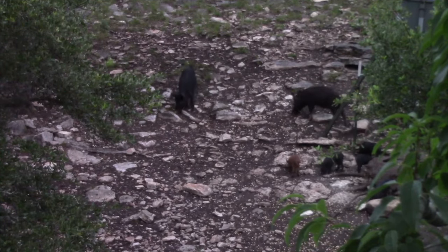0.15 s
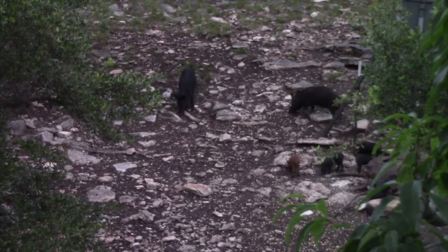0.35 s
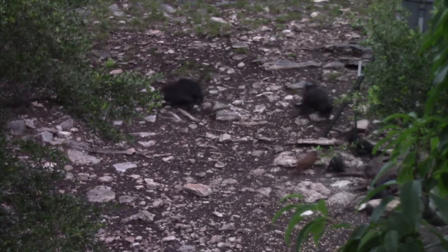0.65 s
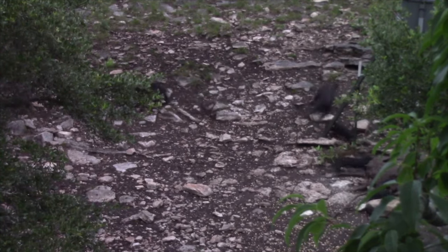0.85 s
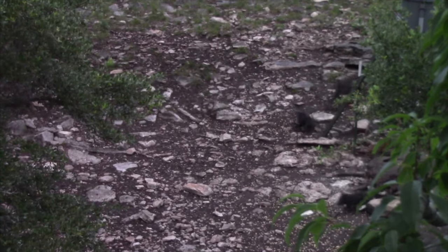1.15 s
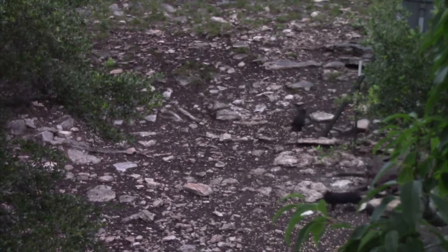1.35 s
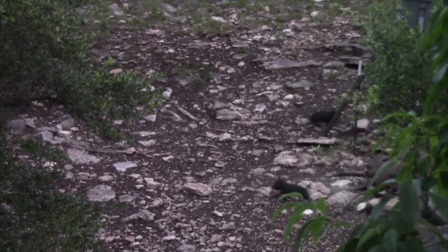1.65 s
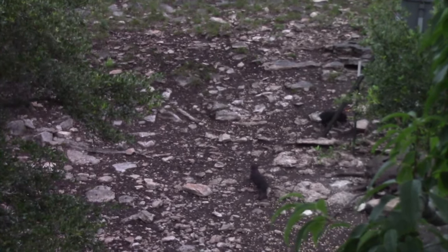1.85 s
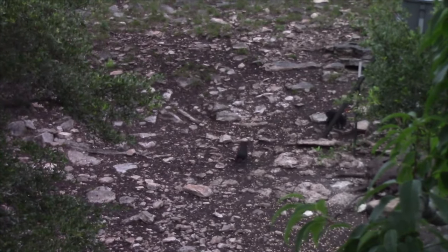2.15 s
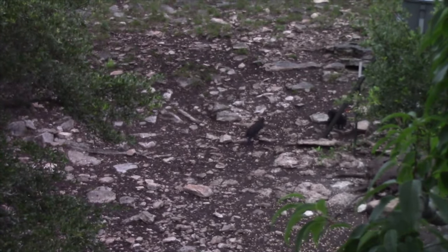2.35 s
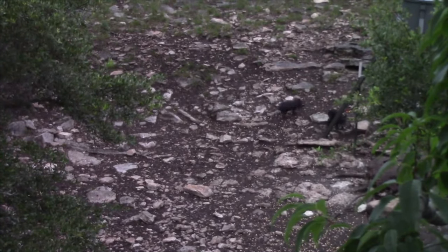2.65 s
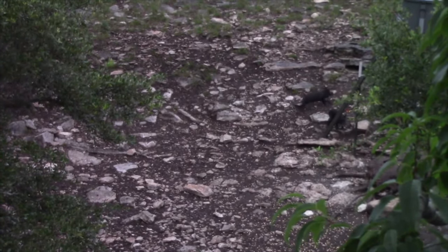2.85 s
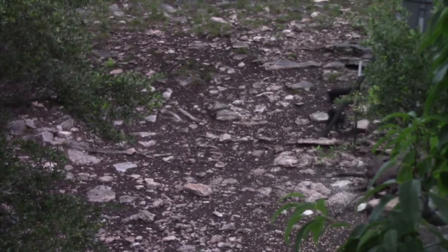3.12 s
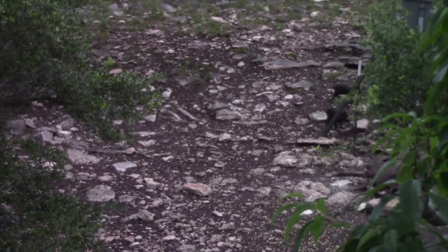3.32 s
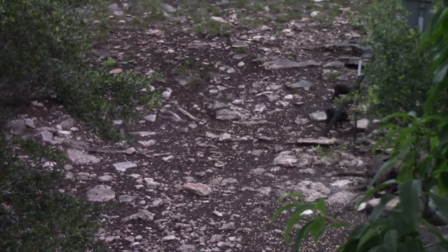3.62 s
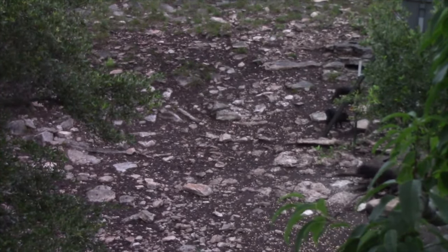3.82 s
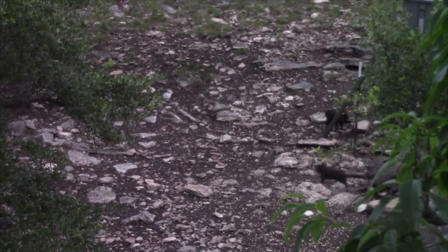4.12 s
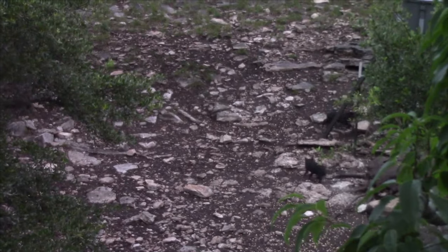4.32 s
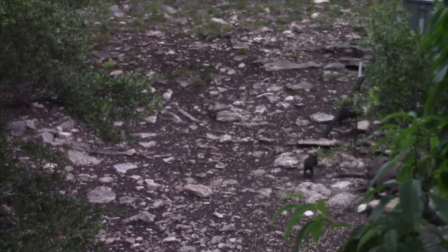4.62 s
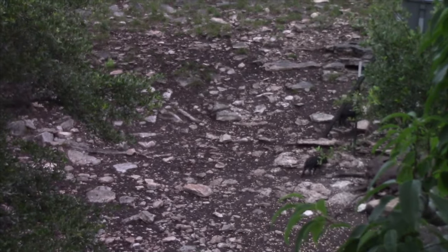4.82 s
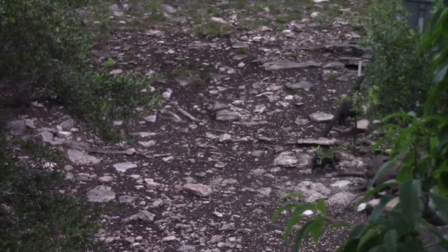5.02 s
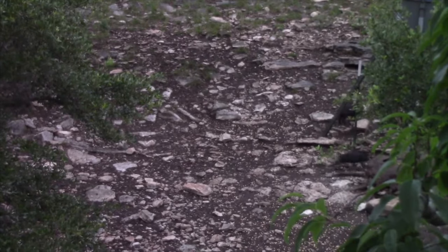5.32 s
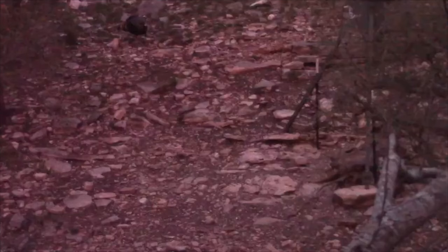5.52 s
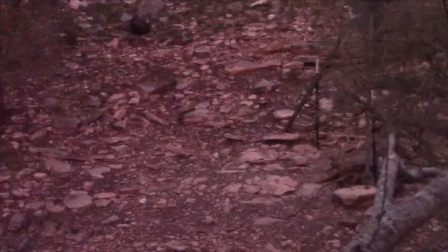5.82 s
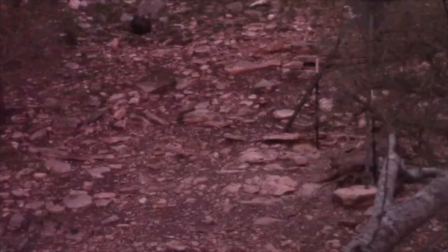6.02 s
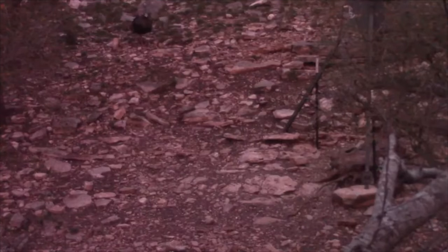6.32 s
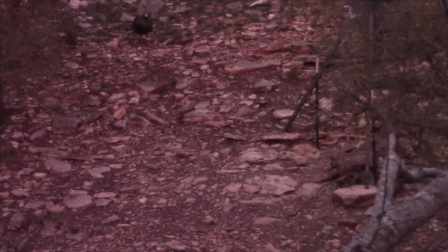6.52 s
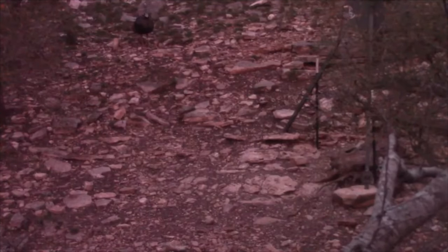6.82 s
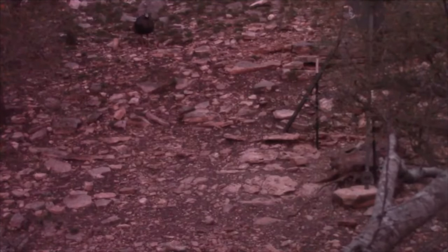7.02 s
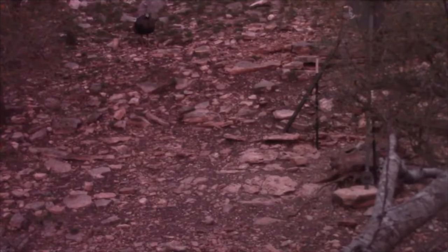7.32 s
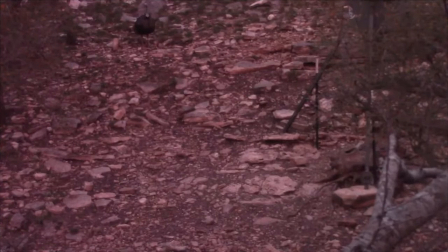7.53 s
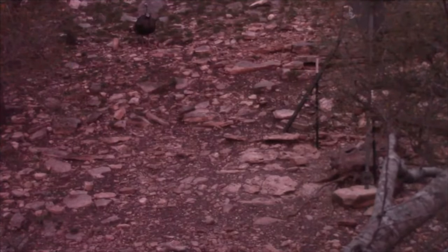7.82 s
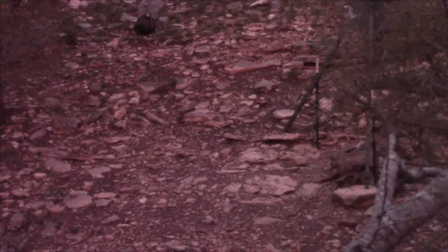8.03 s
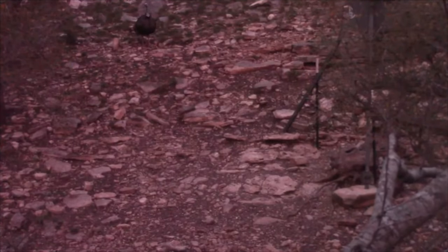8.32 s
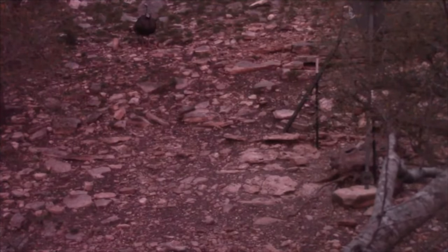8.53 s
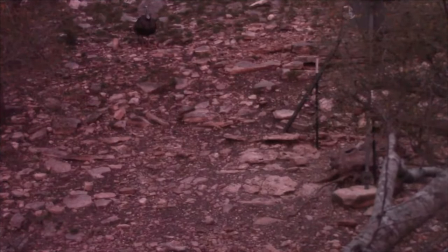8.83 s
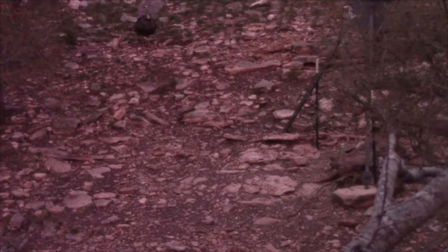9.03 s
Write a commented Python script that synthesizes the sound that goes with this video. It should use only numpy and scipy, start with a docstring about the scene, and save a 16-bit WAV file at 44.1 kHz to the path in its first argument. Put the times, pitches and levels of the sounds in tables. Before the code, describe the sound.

Bow twang and arrow thud startle animals into a clattering run across stones and leaf litter, frogs calling, before a cut to faint insects and wind buffets.

```python
"""Bow shot and bolting pigs in a stony clearing.

A trigger click, a bow (decaying modes, noise slaps) and an arrow strike; wild pigs bolt: grain noise for gravel
and leaves, resonant bursts for hooves, stones and twigs. Near frogs call in pulse runs over a noise-band chorus.
After a gap of 30 ms the place is quieter: distant frogs, two faint insect trills (gliding tones) and gusts
of low noise buffeting the microphone.
"""
import sys
import numpy as np
from scipy import signal
from scipy.fft import rfft, irfft, next_fast_len
from scipy.io import wavfile

SR = 44100
rng = np.random.default_rng(int(sys.argv[2]) if len(sys.argv) > 2 else 0)


def waveform_to_disk(signal):
    """Save audio, clipped to [-1, 1], as 16-bit WAV at the path in sys.argv[1]."""
    frames = np.transpose(np.atleast_2d(signal))
    scaled = np.clip(frames, -1, 1) * 32767
    samples = np.round(scaled).astype(np.int16)
    wavfile.write(sys.argv[1], SR, samples)


N = 403938
TIME = np.arange(N) / SR

RELEASE_S = 0.2522
GAP_START_S, GAP_END_S = 5.548, 5.578

# arrow punches through and meets the ground: (time [s], onset rms level [dB])
ARROW_BLOWS = [(.5164, -12), (.521, -15.5), (.527, -13.5), (.5335, -16)]


def amp(db):
    """Decibels to gain."""
    return 10 ** (np.asarray(db) / 20)


def unit(x):
    """Scale to rms 1."""
    return x / np.sqrt(np.mean(x ** 2) + 1e-20)


def in_time(rows):
    """Each column of a curve at every sample."""
    s, *columns = np.transpose(rows)
    return [np.interp(TIME, s, c) for c in columns]


def add(out, s, sound):
    """Mix a sound in at a time."""
    i = int(s * SR)
    out[i:i + len(sound)] += sound[:N - i]


def span(length_s):
    """Time axis of a short sound."""
    return np.arange(int(length_s * SR)) / SR


def fade(t, t60):
    """Silent before zero, then falling 60 dB in t60 seconds."""
    return (t >= 0) * amp(-60 * np.clip(t / t60, 0, 4))


def swell(s, rise_s, hold_s, fall_db_per_s):
    """Gain that rises from s, holds, then dies away."""
    t = TIME - s
    return np.clip(t / rise_s, 0, 1) * amp(-fall_db_per_s * np.clip(t - rise_s - hold_s, 0, 10))


def summed_db(gains):
    """Level of unrelated sounds heard together."""
    return 10 * np.log10(sum(g ** 2 for g in gains))


def band(x, low_hz, high_hz, order=2):
    """Causal band-pass."""
    edges_hz = [low_hz, min(high_hz, SR / 2 - 2000)]
    return signal.sosfilt(signal.butter(order, edges_hz, "band", fs=SR, output="sos"), x)


def coloured(x, spectrum):
    """Weight a signal by a (frequency [Hz], level [dB]) curve; rms 1."""
    hz, db = np.transpose(spectrum)
    size = next_fast_len(len(x))
    f = np.maximum(np.arange(size // 2 + 1) * SR / size, 1)
    gain = amp(np.interp(np.log(f), np.log(hz), db, left=-90, right=-90))
    return unit(irfft(rfft(x, size) * gain, size)[:len(x)])


def hiss(spectrum, size=N):
    """Smooth noise with a spectrum."""
    return coloured(rng.standard_normal(size), spectrum)


def drift(rate):
    """Slow chance: random knots of spread 1, rate per second, joined by lines."""
    knots = rng.standard_normal(4000)
    return np.interp(TIME * rate, np.arange(len(knots)), knots)


def grains(per_s, spread_db, size=N):
    """Random tiny clicks of uneven size; rms 1."""
    sizes = amp(spread_db * np.minimum(rng.exponential(1, size), 4))
    hits = rng.random(size) < per_s / SR
    return unit(rng.standard_normal(size) * sizes * hits)


def crackle(per_s, spread_db, size=N, count=16):
    """Tiny fractures, each ringing briefly in one of several bands."""
    edges_hz = np.geomspace(400, 16000, count + 1)
    bands = zip(edges_hz, edges_hz[1:])
    return unit(sum(band(grains(per_s / count, spread_db, size), low, high) for low, high in bands))


def snap(hz, t60, width, click=1.0):
    """A hard contact: a click and a dying burst in one broad resonance; peak 1."""
    t = span(.08)
    edge = 1 + abs(width)
    force = rng.standard_normal(len(t)) * fade(t, t60)
    force[0] = click * np.sqrt(np.sum(force ** 2))
    burst = band(force, hz / edge, hz * edge)
    return burst / np.abs(burst).max()


def blows(rows, colour, t60):
    """A quick series of cracks on one body."""
    power = sum((amp(db) * fade(TIME - s, t60)) ** 2 for s, db in rows)
    return hiss(colour) * np.sqrt(power)


def placed(x, pan_db):
    """Lean a sound to the left by pan_db."""
    return x * amp(np.array([[pan_db], [-pan_db]]) / 2)


def release():
    """The trigger clicks just left of the microphone: one very short snap."""
    out = np.zeros(N)
    add(out, RELEASE_S, amp(-0.5) * snap(hz=7500, t60=0.0017, width=0.66))
    return placed(out, pan_db=5.5)


def bow():
    """The arrow hisses and rasps over its rest ever faster, the string slams home and buzzes."""
    # limbs and string: (frequency [Hz], level [dB], t60 [s])
    modes = [(145, -30, .46), (236, -22, .24), (292, -24, .16), (387, -8.5, .5), (415, -15, .22),
             (470, -24, .14), (778, -20, .15), (1048, -21, .4), (1104, -26, .2)]
    # string slaps and fittings rattle: (time [s], onset rms level [dB])
    slaps = [(.2738, -4.5), (.2802, -15), (.2853, -11.5), (.2888, -20), (.319, -25)]
    # rattle spectrum: (frequency [Hz], level [dB])
    rattle_colour = [(100, -26.5), (200, -3), (400, 4), (600, -9.5), (1050, 1), (1400, -8.5), (3000, -9),
                     (5000, -14), (7000, -11), (16000, -30.5)]
    rasp_s, slam_s, string_stop_s = 0.2672, 0.2735, 0.321

    out, t = np.zeros(N), TIME - slam_s
    out += amp(-22.5) * unit(band(rng.standard_normal(N), 1900, 11000)) * fade(TIME - RELEASE_S, t60=0.2)

    u = span(0.0071)
    slide = np.sin(2 * np.pi * np.cumsum(np.geomspace(3000, 6800, len(u))) / SR)
    shaft = np.sin(2 * np.pi * 2900 * u)
    rasp = amp(-15.5) * slide + amp(-3) * shaft * fade(u, t60=0.028)
    add(out, rasp_s, rasp * signal.windows.tukey(len(u), .4))

    # the string comes to rest against its damper; the heavy limbs (below 330 Hz) ring on
    damper_db = np.interp(TIME, [string_stop_s, string_stop_s + .01, string_stop_s + .12], [0, -15, -30])
    attack = np.clip(t / 0.0016, 0, 1)
    for hz, db, t60 in modes:
        out += amp(db + damper_db * (hz > 330)) * fade(t, t60) * attack * np.sin(2 * np.pi * hz * t)
    rattle = amp(-12.0) * hiss(rattle_colour) * fade(t, t60=0.26)
    slap_colour = [(50, -16.0), (200, 2.5), (900, -3.5), (3000, 6.0), (8000, -1.5), (16000, -22.5)]
    return out + rattle + blows(slaps, slap_colour, t60=0.015)


def arrow():
    """A tick as the point arrives, a run of hollow whacks, then grit flying."""
    # whack spectrum: (frequency [Hz], level [dB])
    whack_colour = [(41, -21), (70, -11), (307, -4.5), (620, -17), (1120, -3), (1600, -16), (2000, -7.5),
                    (5620, -22.5), (8280, -16), (16000, -33)]
    tick_s, grit_s = 0.5075, 0.533
    out = blows(ARROW_BLOWS, whack_colour, t60=0.027)
    add(out, tick_s, amp(-20.5) * snap(hz=8750, t60=0.025, width=0.06))
    add(out, tick_s, amp(-24.5) * snap(hz=2980, t60=0.008, width=0.49))
    chips = crackle(per_s=6000, spread_db=3.5)
    grit = coloured(chips, [(500, 2.0), (2000, -9), (4000, -2), (10000, -1.0), (16000, -18)])
    return out + amp(-25.5) * grit * fade(TIME - grit_s, t60=0.21)


def bustle(fall_db_per_s, axis):
    """Level [dB] of hooves on stones (axis 0) or leaves (1): grazing, stampede, stragglers, single dashes."""
    # single pigs dash across: (time [s], trampling level [dB], dry leaves level [dB])
    dash_rows = [(1.96, -51.5, -52), (2.42, -57, -56), (3.02, -64, -58.5), (3.83, -59.5, -58),
                 (4.44, -49, -54.5), (4.83, -64, -71)]
    # (trampling, dry leaves)
    stampede_db, stragglers_db, grazing_db = (-47, -45.5), (-58, -61.5), (-60, -73)
    bolt_s = 0.3
    flat_out = swell(bolt_s, rise_s=0.2, hold_s=0.32, fall_db_per_s=fall_db_per_s)
    stampede = amp(stampede_db[axis]) * flat_out
    stragglers = amp(stragglers_db[axis]) * (TIME > bolt_s)
    dashes = [amp(db[axis]) * swell(s, rise_s=0.011, hold_s=0.056, fall_db_per_s=56) for s, *db in dash_rows]
    return summed_db([amp(grazing_db[axis]), stampede, stragglers, *dashes])


def pebbles(ground_db, above_db=-3.0, count=90):
    """Small stones and twigs tick at random, louder while the herd is busy."""
    out = np.zeros(N)
    start_s = ARROW_BLOWS[0][0]
    for when, pitch, size in rng.random((count, 3)):
        s = start_s + when * (GAP_START_S - start_s)
        hz = 400 * 16 ** pitch
        level_db = ground_db[int(s * SR)] + above_db + 9 * size ** 2
        add(out, s, amp(level_db) * snap(hz, t60=.018, width=.7))
    return out


def herd():
    """Gravel and leaf litter crackle under the hooves in clumps; branches swish past."""
    # gravel and leaf spectra: (frequency [Hz], level [dB])
    gravel_colour = [(40, -33.5), (90, -3), (280, 1.5), (570, -0.5), (750, -4), (1250, -5.5), (2600, -8.5),
                     (3500, -22)]
    leaf_colour = [(1800, -22.5), (2700, 9.5), (4800, 1), (7000, -2.5), (10500, -8.5), (16000, -24)]
    # bodies brush twigs and leaves: (time [s], level [dB], length [s], centre [Hz])
    swishes = [(0.782, -32, 0.008, 3440), (0.913, -40.5, 0.025, 5500), (1.753, -46, 0.026, 7200),
               (1.891, -58, .15, 9000), (3.012, -39, 0.019, 3000), (3.019, -39, 0.012, 7300),
               (3.111, -50, 0.05, 2600), (4.433, -44, 0.055, 1900), (4.802, -45, 0.09, 3300),
               (5.021, -45.5, 0.036, 2650), (5.132, -49, 0.027, 2570)]

    ground_db = bustle(fall_db_per_s=9.5, axis=0)
    litter_db = bustle(fall_db_per_s=22, axis=1)
    steps_db = 3.7 * drift(rate=55)
    out = amp(ground_db + steps_db) * coloured(grains(per_s=2000, spread_db=-2.0), gravel_colour)
    out += amp(litter_db + steps_db) * coloured(crackle(per_s=12000, spread_db=2.5), leaf_colour)
    for s, db, length_s, hz in swishes:
        t = span(.4)
        sprays = unit(band(crackle(per_s=7000, spread_db=2.5, size=len(t)), hz / 2.9, hz * 1.3))
        bend = np.interp(t, [0, abs(length_s)], [.3, 1])   # the branch loads up, then lets go
        add(out, s, amp(db) * sprays * bend * fade(np.maximum(t - length_s, 0), t60=0.12))
    return out + pebbles(ground_db)


def hoofbeats():
    """A hoof on gravel gives a short dull scuff: a resonant burst with a soft click."""
    # (time [s], peak level [dB], centre [Hz])
    landings = [(0.461, -33, 750), (0.836, -31.5, 626), (1.439, -34, 580), (1.547, -45, 810),
                (2.198, -38, 1030), (2.689, -38.5, 585), (3.127, -35.5, 930), (4.454, -31, 1860),
                (4.479, -33, 1500), (4.503, -28, 1700), (4.558, -32.5, 700), (4.598, -28.5, 1090)]
    out = np.zeros(N)
    for s, db, hz in landings:
        add(out, s, amp(db) * snap(hz, t60=0.1, width=0.63, click=0.65))
    return out


def knocks(ring_db=7.5, crack_db=0.0, thud_db=-10.0):
    """Each stone gives a sharp crack, a short clack and a thud of the ground; a few things ring on roughly."""
    # hooves knock stones: (time [s], level ahead of ring_db or thud_db [dB], ring [Hz], treble level [dB])
    stones = [(0.697, -30, 1640, -29), (0.787, -16.5, 2120, -17.5), (0.889, -25.5, 1550, -39),
              (0.981, -31, 533, -44), (1.25, -31, 2080, -30), (1.97, -28, 1840, -47),
              (2.4258, -37.5, 1230, -29), (2.902, -33.5, 710, -42), (3.146, -34.5, 1870, -58),
              (3.473, -41.5, 885, -39), (3.541, -33, 1800, -31.5), (3.843, -31.5, 1030, -22),
              (4.488, -39, 1670, -33), (4.681, -21, 1400, -22)]
    # struck things that ring on: (time [s], peak level [dB], frequency [Hz], t60 [s])
    pings = [(.527, -14, 1020, 0.025), (.805, -37, 8950, 0.11), (1.972, -35, 4970, 0.13),
             (3.539, -40.5, 1687, 0.37), (4.602, -24, 1090, 0.027), (4.6822, -15, 1110, 0.023),
             (4.681, -20, 5700, 0.014), (4.891, -33, 243, 0.06), (4.903, -42, 4530, 0.36)]
    out = np.zeros(N)
    for s, db, hz, treble_db in stones:
        add(out, s, amp(db + ring_db) * snap(hz, t60=.018, width=.55))
        add(out, s, amp(treble_db + crack_db) * snap(hz=5660, t60=0.038, width=0.72))
        add(out, s, amp(db + thud_db) * snap(hz=365, t60=0.021, width=1.0))
    for s, db, hz, t60 in pings:
        t = span(.3)
        pair = np.zeros(len(t))
        for partial_hz in (hz, hz * 1.025):
            rough_hz = partial_hz * (1 + .035 * drift(rate=900)[:len(t)])
            pair += np.sin(2 * np.pi * np.cumsum(rough_hz) / SR)
        add(out, s, amp(db) * fade(t, t60) * pair / 2)
    return out


def twigs(wander=0.5):
    """Each dry twig snaps at a random pitch of its own."""
    # (time [s], peak level [dB])
    snaps = [(.648, -30), (.731, -28), (1.027, -37), (1.136, -30), (3.015, -33), (3.096, -27), (3.436, -37),
             (4.043, -39), (4.5096, -31), (4.557, -31), (5.657, -33)]
    out = np.zeros(N)
    for s, db in snaps:
        hz = 7200 * np.exp(wander * rng.uniform(-2, 2))
        add(out, s, amp(db) * snap(hz, t60=.024, width=.6))
    return out


def frog_call(hz, pulses, scatter=.025):
    """A run of pulses, each rising quickly and sliding down in pitch as it dies; the run weakens and sags."""
    pulse_s, rise_s, decay_s = 0.0041, 0.0009, 0.0012
    fall_db, sag = 13.0, 0.016   # over the run; sag as a share of pitch
    bend_per_s = 50.0            # in the phase: pitch falls at twice this share per second

    out, t = np.zeros(int(.1 * SR)), span(.008) - .003
    count = int(np.clip(np.round(pulses + rng.uniform(-1, 1)), 3, 14))
    shape = np.exp(-(t / np.where(t < 0, rise_s, decay_s)) ** 2)
    bent_t = t - bend_per_s * np.maximum(t, 0) ** 2
    for k, (late, loud, sharp) in enumerate(rng.standard_normal((14, 3))[:count]):
        pitch_hz = hz * (1 + scatter * sharp - sag * (k / count - .5))
        pulse = shape * np.sin(2 * np.pi * pitch_hz * bent_t)
        start_s = pulse_s * abs(k + .17 * late * min(k, 1))
        add(out, start_s, amp(1.5 * loud - fall_db * (k / count) ** 2) * pulse)
    return out[int(.0018 * SR):]


def frogs(neighbours_db=-43.0, count=55):
    """A few frogs stand out; weaker neighbours call at random until the gap."""
    # frog: (pitch [Hz], typical level [dB], pulses per call, pitch scatter between pulses [share])
    voices = {"near": (3411, -28.5, 5, 0), "high": (3620, -34, 7, 0.01), "curt": (3260, -31.5, 2.5, .03),
              "low": (2850, -32.5, 4, -0.07), "rival": (3700, -30.5, 6, 0), "far": (3304, -50.5, 7.3, 0.12),
              "faint": (3499, -52, 7, 0.1)}
    # frog: call times [s]
    calls = { "near": [.404, .61, .925, 1.048, 1.178, 1.324, 1.437, 2.136, 2.327, 2.45, 2.561, 2.674, 2.802,
             2.99, 3.136, 3.284, 3.441, 4.703, 4.809, 4.888, 5.03, 5.152, 5.268, 5.38, 5.513], "high":
             [.048, .114, .43, .671, 1.079, 1.22, 1.381, 1.547, 1.693, 2.358, 2.512, 2.845, 3.2, 3.35,
             3.487, 3.627, 4.058, 4.238, 4.645, 4.72, 5.101, 5.395], "curt": [2.949, 3.105, 3.25, 3.392],
             "low": [3.078, 5.055, 5.163], "rival": [3.018, 3.787, 3.936, 4.131, 4.346, 4.515, 4.878, 4.973,
             5.215, 5.438], "far": [5.675, 5.853, 6.01, 6.15, 6.311, 6.472, 6.647, 6.84, 7.209, 7.385,
             7.538, 7.686, 7.823, 8.02, 8.23, 8.43, 8.61, 8.79, 8.965, 9.12], "faint": [6.18, 6.41, 6.56,
             8.4, 8.91]}
    out = np.zeros(N)
    for frog, times in calls.items():
        hz, db, pulses, scatter = voices[frog]
        for s in times:
            loud, sharp = rng.standard_normal(2)
            add(out, s, amp(db + loud) * frog_call(hz * (1 + .016 * sharp), pulses, scatter))
    for when, loud, sharp in rng.random((count, 3)):
        s = np.sqrt(when) * (GAP_START_S - .1)   # denser toward the gap
        add(out, s, amp(neighbours_db - 7 * loud) * frog_call(3500 + 350 * sharp, pulses=7))
    return out


def chorus():
    """Countless far frogs merge into a throbbing band of grain noise."""
    # (time [s], level [dB])
    level_rows = [(0, -55.5), (2.5, -55.5), (4, -53), (5.5, -48)]
    # (frequency [Hz], level [dB])
    colour = [(2400, -28), (3000, -4), (3400, -2), (3800, 9), (4050, -22), (4400, -28)]
    chorus_db, = in_time(level_rows)
    throb_db = 2.2 * drift(rate=70)
    pulses = grains(per_s=900, spread_db=1)
    return amp(chorus_db + throb_db) * coloured(pulses, colour)


def trill(stroke_hz, start_hz, end_hz):
    """Every wing stroke is a note that holds, then falls; the loudness wavers."""
    stroke = np.cumsum(stroke_hz * (1 + 0.025 * drift(rate=5))) / SR % 1
    pitch_hz = start_hz + (end_hz - start_hz) * stroke ** 1.5 + 45 * drift(rate=390)
    tone = np.sin(2 * np.pi * np.cumsum(pitch_hz) / SR)
    return amp(1.5 * drift(rate=8)) * unit(np.sqrt(np.sin(np.pi * stroke)) * tone)


def insects():
    """Two distant insects, one with a deep fall and one nearly level, blurred by the trees; they swell slowly."""
    # (time [s], level [dB])
    swell_rows = [(5.7, -71), (6.85, -73), (7.15, -68), (7.55, -72.5), (9.0, -67.5)]
    notes = trill(stroke_hz=60.7, start_hz=4860.0, end_hz=4130.0)
    notes += amp(-7) * trill(stroke_hz=58.0, start_hz=4850.0, end_hz=4520.0)
    swell_db, = in_time(swell_rows)
    return amp(swell_db) * clearing(notes, wet_db=-10, t60=0.24)


def wind():
    """Lumpy low turbulence: lone gusts, then a freshening breeze; hard buffets reach higher in pitch."""
    # gusts on the microphone: (time [s], length [s], level [dB])
    gust_rows = [(5.56, 0.089, -55.5), (5.979, 0.048, -55), (6.114, 0.097, -57), (6.468, .02, -65.5),
                 (6.662, 0.13, -57.5), (6.842, 0.039, -53), (7.02, 0.046, -58), (7.239, 0.39, -63.5),
                 (8.329, 0.21, -46.5), (8.692, 0.042, -41.5), (9.053, .15, -35.5)]
    # single buffets: (time [s], level [dB], half length [s])
    buffets = [(7.86, -39.5, 0.014), (8.801, -31, 0.011), (8.963, -37, 0.0149), (9.074, -28.5, 0.017)]
    # (frequency [Hz], level [dB])
    colour = [(35, -41), (95, -6.5), (170, 3.5), (290, 2), (430, -7), (850, -25.5), (1100, -32),
              (2000, -73)]
    rise_s, fall_db_per_s, lull_db = 0.017, 190, -71.5
    breeze_s, breeze_db, freshen_db_per_s = 7.8, -51.5, 5.5

    gusts = [amp(db) * swell(s, rise_s, length_s, fall_db_per_s) for s, length_s, db in gust_rows]
    t = TIME - breeze_s
    breeze = amp(breeze_db + freshen_db_per_s * t) * np.clip(t / rise_s, 0, 1)
    lumps_db = 6 * np.tanh(drift(rate=55))
    level_db = summed_db([amp(lull_db), breeze, *gusts]) + lumps_db
    out = (TIME > GAP_END_S) * amp(level_db) * hiss(colour)
    puff_colour = [(60, -65), (150, -5), (300, 2.0), (600, -12.0), (1200, -31.5), (2200, -60)]
    for s, db, half_s in buffets:
        size = len(span(2 * half_s))
        add(out, s - half_s / 2, amp(db) * hiss(puff_colour, size) * np.hanning(size))
    return out


def clearing(x, wet_db, t60):
    """Trunks and rocks scatter a thin tail: convolution with fading grains."""
    t = span(.6)
    scatter = band(grains(per_s=4400, spread_db=0.0, size=len(t)), 110, 11000, order=1)
    tail = unit(scatter * fade(t - .004, t60))
    return x + amp(wet_db) * signal.fftconvolve(x, tail / np.sqrt(len(t)))[:N]


def widened(x, treble_db, bass_db, corner_hz=4300.0):
    """Foliage scatters sound differently to each ear, treble and bass each by their own amount."""
    scattered = x * unit(drift(rate=400))
    side = amp(treble_db) * band(scattered, corner_hz, 18000)
    side += amp(bass_db) * band(scattered, 40, corner_hz)
    return x + side * np.array([[1], [-1]])


def scene():
    """The shot and the stampede, a brief gap, then the quiet clearing."""
    # steady air noise: (frequency [Hz], level [dB])
    air_colour = [(30, -22.5), (50, -9.5), (167, -7), (770, -18), (2500, -19), (3470, -14.5), (5200, -21),
                  (13100, -31.5), (16000, -41.5)]
    frog_return_s = 5.67
    before, after = TIME < GAP_START_S, TIME > GAP_END_S

    shot = widened(clearing(bow(), wet_db=-25.0, t60=0.33), treble_db=-14.0, bass_db=-36)
    strike = widened(clearing(arrow(), wet_db=-12.5, t60=0.75), treble_db=-43, bass_db=-40.0)
    contacts = knocks() + hoofbeats() + twigs()
    hits = widened(clearing(contacts, wet_db=-19, t60=0.079), treble_db=-24.5, bass_db=-25)
    pigs = widened(clearing(herd(), wet_db=-12.0, t60=0.19), treble_db=-22, bass_db=-13.5)
    pond = clearing(frogs(), wet_db=-7.0, t60=0.12)
    wildlife = before * chorus() + after * insects() + (before | (TIME > frog_return_s)) * pond
    far = widened(wildlife, treble_db=-7.5, bass_db=-19.5)
    air = (before | after) * widened(amp(-62.0) * hiss(air_colour), treble_db=-18.5, bass_db=-26)
    return release() + before * (shot + strike + pigs) + hits + far + air + wind()


def record(dry, low_cut_hz=69.0, cutoff_hz=15900):
    """The small microphone loses the deep bass, peaks clip, the top is cut."""
    thin = signal.sosfilt(signal.butter(3, low_cut_hz, "high", fs=SR, output="sos"), dry)
    clipped = np.clip(thin, -.9, .9)
    return signal.sosfilt(signal.ellip(10, .1, 80, cutoff_hz, fs=SR, output="sos"), clipped)


dry = scene()
out = record(dry)
waveform_to_disk(out)
```